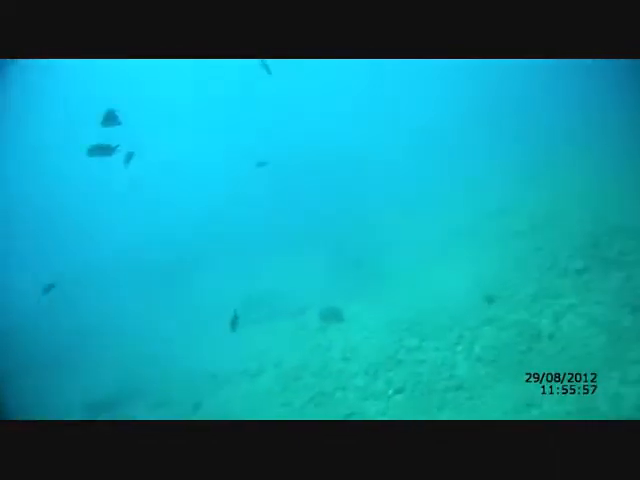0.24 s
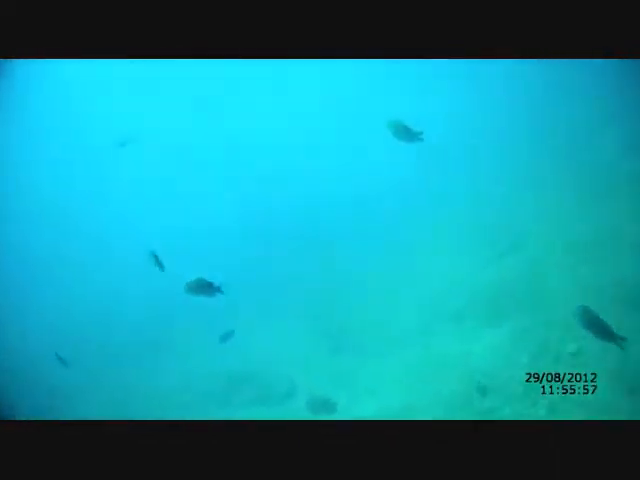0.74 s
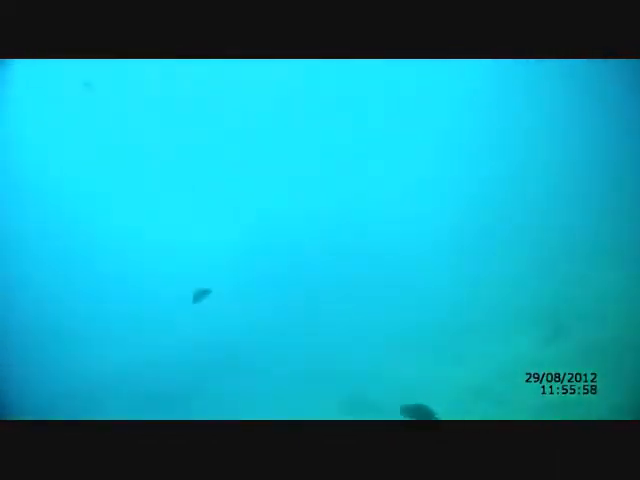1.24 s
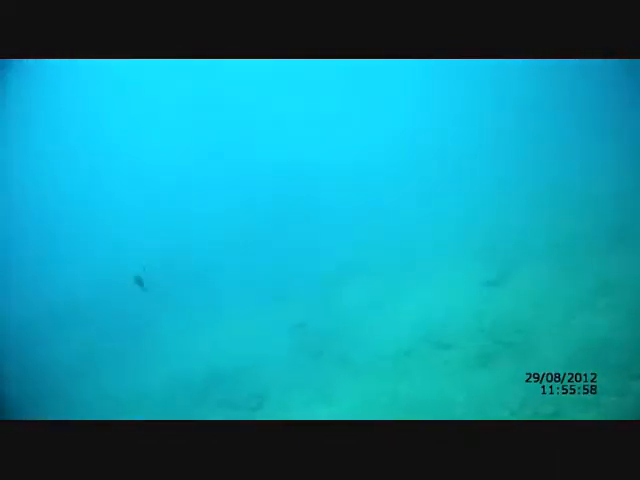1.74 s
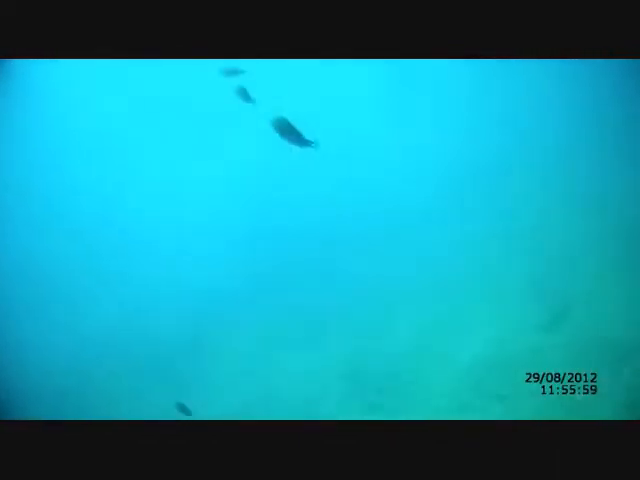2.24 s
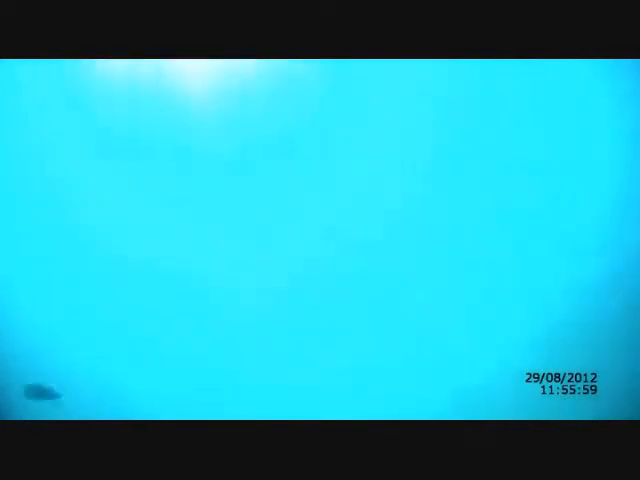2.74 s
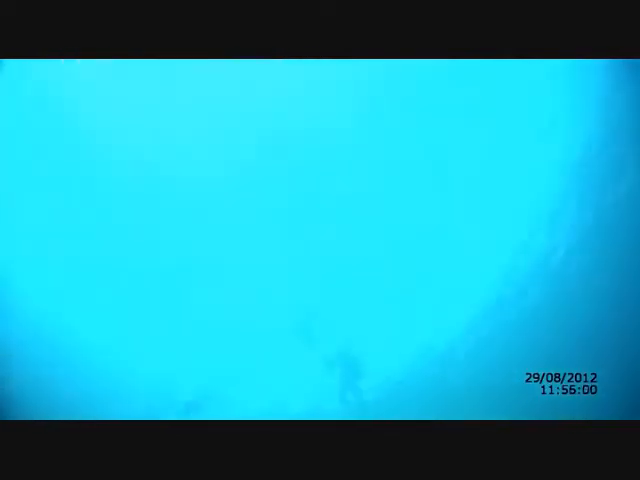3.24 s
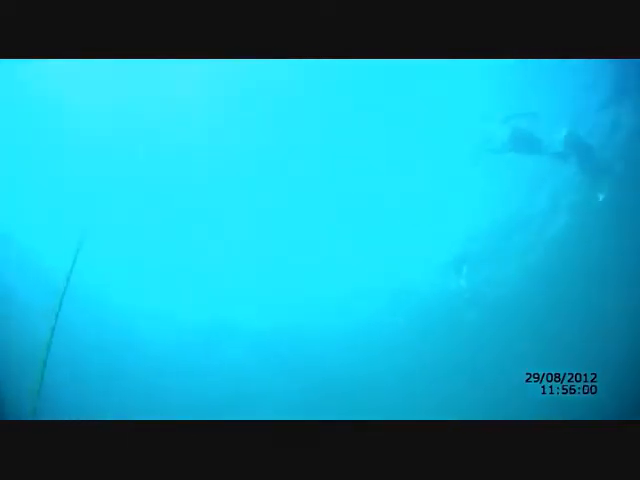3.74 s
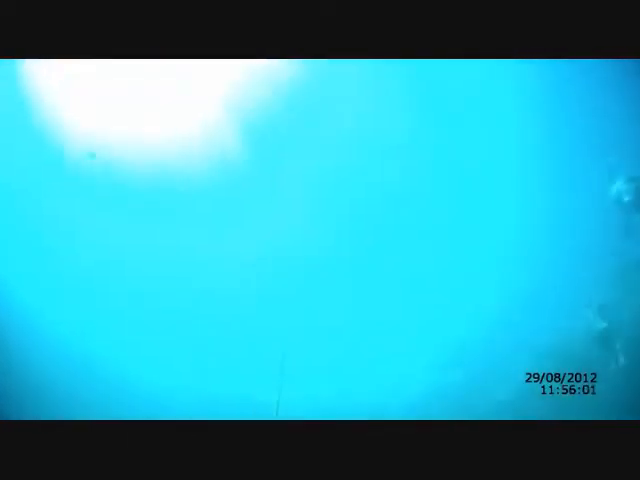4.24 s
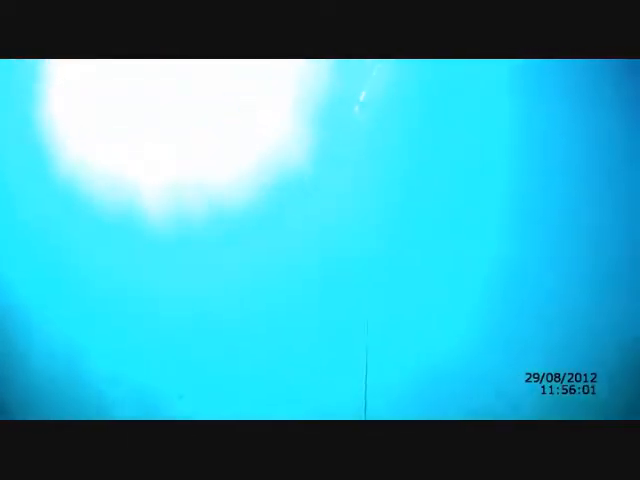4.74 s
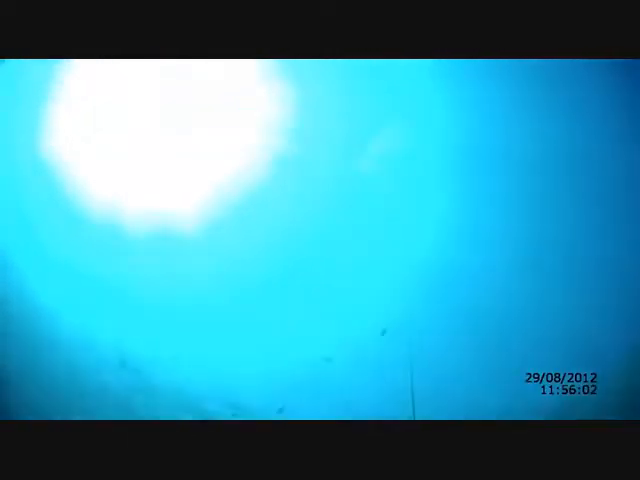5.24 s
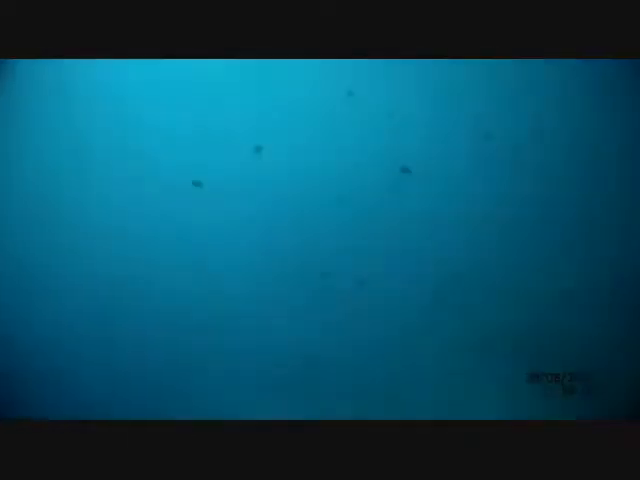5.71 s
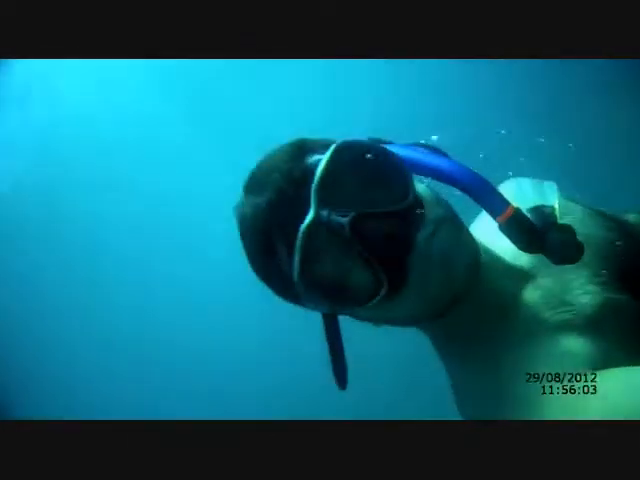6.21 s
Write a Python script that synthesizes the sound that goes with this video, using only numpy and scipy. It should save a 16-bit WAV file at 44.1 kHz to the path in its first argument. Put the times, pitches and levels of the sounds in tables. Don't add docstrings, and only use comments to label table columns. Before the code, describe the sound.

A hand-held submerged microphone in a hollow, resonant shell picks up close, muffled water. Fine crackle and fizz never quite stop. First a brief finger squeak with ringing bubbles, then a gentle glug, sparse ticks, two bubbly flurries, a quieter spell, a grip knock, and finally a rapid stuttering snag and the loudest click, ending in bubbles and snaps.

```python
import sys
import numpy as np
from scipy import signal
from scipy.fft import rfft, irfft
from scipy.io import wavfile

SR = 44100
rng = np.random.default_rng(int(sys.argv[2]) if len(sys.argv) > 2 else 0)


def store_wav(level_fs):
    pcm = np.round(np.clip(np.atleast_2d(level_fs), -1, 1) * 32767)
    wavfile.write(sys.argv[1], SR, pcm.T.astype(np.int16))


def convert_level_to_amplitude(level_db):
    exponent = np.asarray(level_db, float) / 20
    return 10 ** exponent


N = 285327


def in_time(rows):
    s, *columns = np.transpose(rows)
    return [np.interp(np.arange(N) / SR, s, c) for c in columns]


def rms_one(x):
    return x / np.sqrt(np.mean(x ** 2) + 1e-20)


def summed_db(*levels_db):
    return 10 * np.log10(sum(convert_level_to_amplitude(db) ** 2 for db in levels_db))


def edge(x, hz, kind, order=2):
    return signal.sosfilt(signal.butter(order, hz, kind, fs=SR, output="sos"), x)


def band(x, low_hz, high_hz):
    sos = signal.butter(2, [low_hz, min(high_hz, 18000)], "band", fs=SR, output="sos")
    return signal.sosfilt(sos, x)


def drift(rate_hz):
    hop = 40
    r = np.exp(-2 * np.pi * hop * rate_hz / SR)
    white = rng.standard_normal(N // hop + 2002)
    slow = signal.lfilter([1], [1, -2 * r, r * r], white)[2000:]
    return np.interp(np.arange(N) / hop, np.arange(len(slow)), rms_one(slow))


def add(out, s, sound):
    i = max(round(s * SR), 0)
    out[i:i + len(sound)] += sound[:N - i]


def alike(rows, hz, t60_s):
    return [(s, db, hz, t60_s) for s, db in rows]


def rings(rows, rise_s, glide, wobble, spray):
    out = np.zeros(N)
    chance = rng.standard_normal((len(rows), 2))
    white = rng.standard_normal(N + SR)
    for (s, db, hz, t60_s), (detune, twin_phase) in zip(rows, chance):
        t = np.arange(round(3 * t60_s * SR)) / SR
        phase = 2 * np.pi * hz * t * (1 + glide * t / t60_s)
        rise = 1 - np.exp(-t / rise_s)
        twin = np.sin(phase * (1 + np.clip(0.071 * detune, -.1, .1)) + twin_phase)
        tone = rise * convert_level_to_amplitude(-60 * t / t60_s) * (np.sin(phase) + wobble * twin)
        mist = rms_one(band(white[round(s * SR):][:len(t)], hz / 1.45, hz * 1.21))
        mist = rise * convert_level_to_amplitude(-30 * t / t60_s) * mist
        add(out, s, convert_level_to_amplitude(db) * (tone / np.abs(tone).max() + spray * mist))
    return out


def resonances(x, modes):
    out = 0
    for k, (hz, width_hz, db) in enumerate(modes):
        r = np.exp(-np.pi * width_hz / SR)
        poles = [1, -2 * r * np.cos(2 * np.pi * hz / SR), r * r]
        mode = signal.lfilter([(1 - r * r) / 2, 0, (r * r - 1) / 2], poles, x + 1e-18)
        out = out + (-1) ** (k // 2) * convert_level_to_amplitude(db) * mode
    return out


def housing(x):
    # pitch_hz, width_hz, level_db
    shell_modes = [(674, 270, -36), (787, 130, 3), (1130, 198, 2), (1630, 520, 2), (1980, 505, 6.5),
                   (2430, 147, -3.5), (3370, 330, -14.5), (3900, 830, -5.5), (5020, 540, 2), (5700, 253, 5),
                   (7036, 534, 4), (8400, 500, -7.5), (12000, 2100, -28.5)]
    return resonances(x, shell_modes)


def big_bubbles():
    # start_s, peak_db, pitch_hz, t60_s
    loose = [(0.396, -34.5, 1090, 0.056), (0.413, -32.5, 1114, 0.043), (0.478, -44, 1180, 0.064),
             (0.502, -11, 1235, 0.027), (0.503, -15, 846, 0.023), (0.54, -33, 1130, 0.015),
             (0.611, -36, 1140, 0.03), (0.785, -35.5, 1330, 0.013), (1.139, -36, 994, 0.018),
             (2.396, -32.5, 1236, 0.046), (2.485, -37.5, 1284, 0.039), (2.543, -38.5, 607, 0.021),
             (2.603, -32.5, 1260, 0.025), (2.6065, -25, 2068, 0.048), (2.609, -32, 960, 0.018),
             (2.675, -36, 1370, 0.036), (2.677, -34, 2080, 0.032), (2.666, -28, 1130, 0.051),
             (2.721, -28.5, 1154, 0.032), (2.985, -35, 1074, 0.037), (3.672, -39, 765, 0.059),
             (3.691, -30, 1130, 0.074), (3.753, -40, 1140, 0.22), (3.775, -27, 1017, 0.019),
             (3.798, -30.5, 1038, 0.11), (3.879, -36.5, 1018, 0.1), (3.923, -35.5, 1069, 0.071),
             (3.973, -34, 786, 0.055), (4.037, -26.5, 1070, 0.038), (4.096, -36, 960, 0.021),
             (4.15, -40.5, 1167, 0.083), (5.4365, -29, 1033, 0.019), (5.8832, -19.5, 1130, 0.017),
             (5.8855, -16, 1680, 0.019), (5.947, -36, 1077, 0.061), (5.98, -35.5, 1110, 0.037),
             (6.306, -20, 1140, 0.029)]
    # start_s, peak_db, pitch_hz, t60_s
    snag_ring = [
        (5.812, -16, 410, 0.02),
        (5.8198, -17.5, 440, 0.013),
        (5.8243, -17, 423, 0.044),
    ]
    # start_s, peak_db
    pops = [(0.091, -45.5), (0.332, -39.5), (0.573, -45), (0.847, -43.5), (1.368, -40), (1.586, -43),
            (1.662, -39.5), (1.744, -41.5), (2.061, -44), (2.126, -37.5), (2.236, -45), (2.264, -43),
            (2.291, -40), (2.385, -43), (2.572, -41.5), (2.784, -41.5), (2.971, -39), (3.25, -46.5),
            (4.0, -47), (4.176, -40.5), (4.349, -38.5), (4.445, -40), (4.645, -42), (4.67, -41.5),
            (4.744, -39), (4.904, -36.5), (5.094, -42.5), (5.298, -43), (5.906, -39)]
    # start_s, peak_db
    gulps = [(0.649, -46), (0.716, -43), (1.193, -42), (1.244, -42.5), (1.3, -44.5), (1.352, -44.5),
             (1.445, -51), (1.498, -47), (0.331, -46), (0.352, -52), (0.397, -41), (3.72, -42),
             (3.866, -42), (4.0, -50), (4.035, -37.5), (4.065, -43.5), (4.18, -46)]
    # start_s, peak_db, pitch_hz
    trickle = [(1.015, -46, 1180), (1.066, -50, 1210), (1.094, -49, 800), (1.209, -43.5, 1150),
               (1.284, -48, 860), (1.314, -52, 780), (1.384, -42.5, 1170), (1.444, -48, 1190),
               (1.609, -47, 1300), (1.628, -49, 1050), (1.706, -50, 795), (3.686, -35, 1205),
               (3.7, -32, 1030), (3.707, -33.5, 864), (3.764, -38, 1120), (3.786, -36, 1020),
               (3.811, -29, 1013), (3.823, -31, 975), (3.832, -41, 860), (3.891, -40, 780),
               (3.9, -45, 1080), (3.93, -41, 1060), (4.161, -39, 1030), (1.0186, -46, 2080),
               (1.044, -49, 2470), (1.279, -48, 1950), (1.4721, -48, 2060), (1.5744, -47.5, 2130),
               (1.6244, -48, 2030), (1.6494, -50, 2470), (1.6644, -47, 1900), (3.6594, -45, 1860),
               (3.6994, -39, 1830), (3.7194, -45, 2130), (3.7499, -44, 1830), (3.8094, -45, 2290),
               (3.8194, -42, 2120), (3.8294, -40, 2720), (3.8641, -43, 2100), (3.896, -51, 2430),
               (3.9295, -44, 2640), (4.0951, -48, 1890), (4.149, -51, 1980)]
    rows = loose + snag_ring + alike(pops, hz=1140, t60_s=0.029) + alike(gulps, hz=807, t60_s=0.065)
    rows = rows + [(s, db + 0.5, hz, 0.035) for s, db, hz in trickle]
    return rings(rows, rise_s=0.0014, glide=0.024, wobble=0.3, spray=0.11)


def small_bubbles():
    # start_s, peak_db, pitch_hz
    mixed = [(1.673, -46.5, 3900), (0.277, -43.5, 2610), (0.394, -38.5, 2430), (0.938, -48, 3360),
             (0.654, -45, 2380), (0.713, -37.5, 2400), (0.776, -43, 2430), (0.7881, -32.5, 1630),
             (1.08, -44, 3300), (1.14, -40.5, 2430), (1.1908, -43, 3380), (1.517, -49, 2340),
             (2.4827, -43, 3070), (2.535, -33.5, 1790), (2.601, -29, 1970), (2.6655, -29, 1700),
             (2.755, -44, 3240), (2.7767, -40.5, 2340), (3.632, -43.5, 2600), (3.7942, -38, 2320),
             (3.862, -37.5, 3540), (3.9465, -48, 2720), (4.51, -41.5, 3030), (4.507, -47, 3900),
             (4.49, -39, 1600), (4.674, -42.5, 1570), (4.768, -49, 3620), (3.05, -41.5, 2450),
             (2.998, -44.5, 3220), (1.8, -49, 2490), (1.853, -47.5, 3370), (4.469, -34, 1830),
             (4.5472, -35, 1790), (5.249, -43.5, 3380), (5.9702, -37, 2130), (6.0012, -29.5, 2075),
             (6.3405, -37, 3210), (6.3733, -29.5, 1754)]
    # start_s, peak_db
    plinks = [(0.3311, -43.5), (0.5731, -33), (0.608, -41), (1.3697, -38.5), (1.605, -40.5), (1.632, -46),
              (1.9131, -34), (2.1091, -43), (2.1287, -37.5), (2.373, -41), (2.3952, -37.5), (2.718, -39),
              (2.7386, -34), (2.9722, -34), (3.1043, -42.5), (3.1764, -39.5), (3.68, -36.5), (3.773, -37),
              (3.9722, -31), (4.0342, -39), (4.061, -41), (4.5845, -32.5), (5.0714, -38.5), (5.5917, -45.5),
              (6.1189, -42), (6.1708, -43), (6.3055, -30)]
    rows = [(*row, 0.044) for row in mixed] + alike(plinks, hz=1980, t60_s=0.029)
    return rings(rows, rise_s=0.0004, glide=0.029, wobble=0.45, spray=0.2)


def snaps():
    # start_s, peak_db, pitch_hz
    near = [(0.1504, -33.5, 6500), (0.2887, -26, 6600), (0.5666, -29, 5900), (0.594, -30, 4660),
            (0.7522, -30.5, 5900), (1.2787, -33, 5700), (2.265, -29, 5180), (2.396, -31, 3900),
            (2.4416, -30.5, 4840), (2.6008, -25, 6930), (2.678, -30.5, 4760), (2.7191, -30, 8200),
            (2.7846, -31, 5720), (3.0423, -35, 6440), (3.7193, -31, 5850), (3.7746, -23.5, 4730),
            (3.858, -33, 4540), (3.8646, -31, 7200), (4.4461, -31, 6450), (4.4737, -29, 4770),
            (4.838, -31.5, 4960), (5.1397, -33, 6440), (5.254, -27.5, 5020), (5.7244, -36, 6260),
            (5.9762, -26, 5260), (6.0021, -20, 4800), (6.0196, -22, 6100), (6.1588, -34, 6900),
            (6.3763, -21.5, 5300)]
    # start_s, peak_db, pitch_hz
    pricks = [(0.4877, -44, 7750), (0.4883, -29, 7800), (0.615, -38, 8770), (0.7093, -44, 7760),
              (1.1896, -43, 8650), (1.2819, -48, 8800), (1.4636, -49, 10100), (1.4879, -47, 8600),
              (1.5847, -43, 7800), (1.5968, -45, 10100), (1.945, -46, 8300), (2.0202, -45, 8750),
              (2.0604, -46, 7800), (2.1379, -39, 8200), (2.2287, -42, 8000), (2.2797, -48, 10100),
              (2.374, -39.5, 8350), (2.4393, -38, 8500), (2.557, -30.5, 8500), (2.7755, -44, 7700),
              (3.3975, -45, 8600), (3.8461, -40.5, 8600), (4.549, -39, 8500), (5.2495, -37.5, 7300),
              (5.725, -39, 8700), (5.967, -42, 8410), (6.0096, -48, 7750), (6.1558, -47, 8710),
              (6.3856, -21.5, 8400), (6.4013, -48, 8660)]
    # start_s, peak_db, pitch_hz
    crackle = [(0.467, -39, 5900), (0.474, -41, 5950), (0.5062, -31, 5810), (0.5284, -31, 7090),
               (0.535, -40, 5900), (0.549, -39, 5820), (0.5764, -42, 6510), (0.5874, -33, 4840),
               (0.6054, -36, 6800), (0.623, -34, 7340), (0.636, -32.5, 4040), (0.6544, -32, 3200),
               (0.7088, -41, 5740), (0.7786, -53, 5110), (0.8, -46, 6640), (1.0435, -39.5, 5700),
               (1.063, -33.5, 6800), (1.584, -36, 5770), (1.733, -37.5, 5800), (1.879, -40, 4700),
               (1.913, -34.5, 6600), (1.931, -35, 6800), (2.062, -37, 7300), (2.2894, -46, 5690),
               (2.344, -37, 6740), (2.3737, -35, 3720), (2.648, -35, 6600), (2.685, -33, 5810),
               (2.7444, -38.5, 3340), (2.7904, -38, 6740), (2.829, -39, 5900), (2.8526, -37, 6700),
               (2.8802, -38, 5970), (2.9854, -38, 4700), (3.029, -51, 6700), (3.1574, -44, 3900),
               (3.2306, -40, 5730), (3.4837, -34, 6740), (3.556, -32.5, 5700), (4.1495, -38, 4830),
               (4.3494, -46, 6680), (2.449, -33, 4800), (3.126, -45.5, 4340), (4.945, -54, 6860),
               (5.362, -45, 5860), (5.556, -34.5, 5800), (6.0561, -38, 6250), (6.174, -40, 5830),
               (6.2054, -44, 4930), (6.2314, -44, 5100), (6.2584, -36, 5670), (6.4053, -28, 5400),
               (1.133, -39, 6900), (1.4484, -30.5, 5800), (4.164, -38, 4950), (4.274, -36, 6000)]
    rows = near + [(s, db - 3, hz) for s, db, hz in pricks + crackle]
    rows = [(s, db, hz, 70 / hz) for s, db, hz in rows]
    return rings(rows, rise_s=0.000091, glide=0.015, wobble=0.98, spray=0.17)


def after_ticks(t60_s):
    # start_s, peak_db
    tick_rows = [(0.0653, -32), (0.1032, -31), (0.218, -29.5), (0.2404, -52), (0.2733, -41), (0.3476, -38),
                 (0.8895, -37), (1.1318, -35), (1.4485, -44), (1.799, -32.5), (1.822, -40), (1.895, -31.5),
                 (1.944, -44), (2.1181, -33), (2.139, -34), (2.5341, -34.5), (2.9301, -32), (3.0285, -29),
                 (3.0764, -35), (3.18, -34.5), (3.3079, -32.5), (3.3162, -35.5), (3.3963, -38),
                 (3.4241, -42), (3.6314, -35), (3.742, -41), (3.7958, -37), (3.8633, -27.5), (3.8774, -32),
                 (3.91, -35), (3.923, -35), (4.0093, -38), (4.0486, -32.5), (4.5495, -42), (4.6154, -34.5),
                 (4.65, -42), (4.7656, -42), (5.0716, -32), (5.1377, -29.5), (5.6687, -33.5), (5.6884, -39),
                 (5.9515, -35), (6.107, -41), (6.305, -34.5), (6.4422, -34.5)]
    s, db = np.transpose(tick_rows)
    jumps = np.zeros(N)
    jumps[(s * SR).astype(int)] = convert_level_to_amplitude(db)
    return signal.lfilter([1], [1, -convert_level_to_amplitude(-60 / (t60_s * SR))], jumps + 1e-18)


def ticks():
    crack = after_ticks(t60_s=0.021) * rng.standard_normal(N)
    return convert_level_to_amplitude(-4.5) * housing(edge(crack, 2400, "high"))


def finger():
    # start_s, length_s, slips_per_s, peak_db, highest_hz
    slow_creaks = [
        (2.52, 0.043, 94, -37.5, 1000),
        (3.799, 0.016, 560, -35, 3120),
        (5.4265, 0.012, 261, -26, 1060),
        (5.446, .0086, 310, -36.5, 1130),
        (5.998, 0.037, 480, -43, 560),
        (6.075, .055, 520, -47, 560),
    ]
    # start_s, length_s, peak_db, lowest_hz, highest_hz
    rubs = [(0.4845, 0.075, -39, 2700, 9350), (0.7858, 0.003, -30, 1040, 2660),
            (1.744, 0.00056, -36.5, 298, 3400), (4.5484, 0.0013, -31.5, 1500, 9500),
            (4.839, 0.058, -35.5, 3520, 7700), (5.132, 0.098, -43, 3920, 7000),
            (5.16, 0.0022, -35, 3950, 6940), (5.247, 0.077, -39, 3650, 5700),
            (5.261, 0.0012, -30, 1800, 6250), (5.815, 0.01, -16, 4170, 5790),
            (5.8846, 0.0018, -21.5, 8500, 10300), (5.8842, 0.003, -8, 2600, 5100),
            (5.8852, 0.0005, -15, 1500, 12600), (5.893, 0.0018, -16.5, 3210, 3900),
            (5.893, .0019, -12.5, 1500, 9200), (5.907, 0.0036, -29, 3840, 5500),
            (6.369, 0.026, -29, 1560, 6740), (6.374, 0.019, -31, 8000, 11500),
            (0.49, 0.053, -34, 2600, 4180), (0.5, 0.13, -53, 8600, 11800)]
    # start_s, length_s, peak_db, lowest_hz, highest_hz
    squeak = [
        (0.4843, 0.0088, -15, 1980, 2770),
        (0.4865, 0.0074, -21.5, 910, 1520),
        (0.494, 0.016, -20.5, 840, 1550),
        (0.494, 0.0087, -23, 472, 750),
        (0.496, 0.012, -25, 1780, 2450),
    ]
    snag_s = [
        5.8118,
        5.8151,
        5.8189,
        5.8238,
    ]
    # peak_db, lowest_hz, highest_hz
    snag_bands = [
        (-12, 810, 2830),
        (-29.5, 3270, 3900),
        (-28, 7500, 11800),
    ]
    rub_slips_per_s, squeak_slips_per_s, single_slip_s = 1200, 412, 0.0005
    lowest_per_slip = 0.52
    rows = [(s, length_s, per_s, db, lowest_per_slip * per_s, top_hz)
            for s, length_s, per_s, db, top_hz in slow_creaks]
    for contacts, per_s in (rubs, rub_slips_per_s), (squeak, squeak_slips_per_s):
        rows += [(s, length_s, per_s, *rest) for s, length_s, *rest in contacts]
    return rows + [(s, single_slip_s, rub_slips_per_s, *row) for s in snag_s for row in snag_bands]


def creaks():
    # pitch_hz, width_hz, level_db
    hollow = [(445, 40, 4.5)]
    out = np.zeros(N)
    for s, length_s, per_s, db, low_hz, high_hz in finger():
        chance = rng.standard_normal((120, 2))
        gaps = np.exp(per_s / 4000 * chance[1:, 0])
        at_s = np.cumsum(np.r_[0, gaps]) / per_s
        fade_db = 14 * (per_s / 1100 - .45) * at_s / length_s
        inside = at_s < length_s
        slips = np.zeros(N // 30)
        slips[(at_s[inside] * SR).astype(int)] = convert_level_to_amplitude(1.8 * chance[:, 1] - fade_db)[inside]
        contact = band(band(slips, low_hz, high_hz), low_hz, high_hz)
        contact = edge(contact, min(1.09 * high_hz, 18000), "low", order=3)
        full = housing(contact) + 0.018 * contact - resonances(contact, hollow)
        add(out, s, convert_level_to_amplitude(db) * full / np.abs(full).max())
    return out


def knocks():
    # start_s, peak_db, pitch_hz, t60_s
    knock_rows = [(0.324, -53, 83, 0.025), (.495, -27, 270, 0.012), (0.891, -52.5, 146, 0.082),
                  (1.375, -59, 522, 0.12), (1.64, -52, 490, 0.037), (1.746, -37.5, 113, 0.047),
                  (2.212, -43.5, 136, 0.018), (2.509, -50, 88.5, 0.022), (2.753, -43, 129, 0.0076),
                  (3.329, -45, 82.4, 0.026), (3.379, -46, 135, 0.039), (3.685, -45.5, 467, 0.059),
                  (3.69, -48.5, 175, 0.028), (5.4258, -31, 166, 0.06), (5.431, -29, 430, 0.027),
                  (5.735, -39.5, 24.6, 0.55), (5.9, -47, 25.3, 0.49), (5.812, -35, 304, 0.02),
                  (5.88, -37, 96, 0.034), (5.883, -39, 430, 0.037), (6.14, -41.5, 32, 0.16),
                  (6.38, -45, 26, 0.29), (6.364, -50.5, 409, 0.13)]
    return rings(knock_rows, rise_s=0.001, glide=0.023, wobble=0.11, spray=0.45)


def water_levels():
    # time_s, level_db
    stir = [(0.0, -74), (0.358, -47.5), (0.482, -41), (0.49, -31), (0.57, -35), (0.85, -56), (1.29, -52.5),
            (2.11, -55), (2.52, -48), (3.61, -61.5), (3.64, -47.5), (3.88, -49.5), (4.2, -55), (4.74, -51),
            (5.64, -56.5), (5.8, -53), (5.82, -49.5), (6.47, -52.5)]
    stir_db, = in_time(stir)
    t = np.arange(N) / SR - 1.12
    rise_db_per_s, fall_db_per_s = 62, 41
    leak_db = -44 + np.minimum(rise_db_per_s * t, -fall_db_per_s * t)
    wash_db = -19 + 20 * np.log10(after_ticks(t60_s=0.24) + 1e-9)
    gurgle_mean_db = -57
    gurgle_db = gurgle_mean_db + 0.73 * (stir_db - gurgle_mean_db)
    gurgle_db = summed_db(gurgle_db, wash_db - 8.5)
    fizz_db = summed_db(-60.5, stir_db - 11, wash_db)
    glug_db = summed_db(leak_db, stir_db - 16)
    return gurgle_db, fizz_db, glug_db


def grains(per_s, low_hz, high_hz, cycles, spread_db, clump_db, count):
    sizes = convert_level_to_amplitude(spread_db * np.minimum(rng.exponential(1, N), 3.3)) * rng.choice([-1, 1], N)
    born = rng.random(N) < per_s * convert_level_to_amplitude(clump_db * drift(18)) / SR
    dealt, out = rng.integers(0, count, N), 0
    for k, hz in enumerate(np.geomspace(low_hz, high_hz, count)):
        r, w = convert_level_to_amplitude(-60 * hz / (cycles * SR)), 2 * np.pi * hz / SR
        hits = sizes * born * (dealt == k) + 1e-18
        out = out + signal.lfilter([0, np.sin(w)], [1, -2 * r * np.cos(w), r * r], hits)
    return rms_one(out)


def flow(gurgle_db, fizz_db, glug_db):
    bed = rng.standard_normal((2, N))
    glug = grains(160, 680, 900, cycles=35, spread_db=3.5, clump_db=3, count=5)
    gurgle = grains(330, 1016, 3390, cycles=33.4, spread_db=3.5, clump_db=4.5, count=10)
    gurgle = gurgle + 0.31 * rms_one(band(bed[0], 1870, 4100))
    fizz = grains(1800, 3360, 10430, cycles=28.0, spread_db=5.5, clump_db=3.0, count=10)
    fizz = fizz + 0.33 * rms_one(edge(bed[1], 2900, "high"))
    finest = grains(250, 4100, 6900, cycles=4.3, spread_db=2.5, clump_db=4.0, count=3)
    fizz = fizz + 0.64 * finest
    water = convert_level_to_amplitude(glug_db - 12.0) * glug + convert_level_to_amplitude(gurgle_db - 4.0) * gurgle + convert_level_to_amplitude(fizz_db + 1.5) * fizz
    return housing(water)


def ports(shell):
    # pitch_hz, width_hz
    dead_spots = [(970, 67), (1500, 79), (1770, 185), (2930, 32)]
    for hz, width_hz in dead_spots:
        shell = signal.lfilter(*signal.iirnotch(hz, hz / width_hz, fs=SR), shell)
    deep = edge(shell, 390, "low")
    duller = edge(shell - deep, 1600, "low", order=1)
    sides = np.array([[1], [-1]])
    left_minus_right_db = 6
    ringing = (shell - deep + 0.074 * sides * duller) * convert_level_to_amplitude(left_minus_right_db * sides / 2)
    return 0.94 * ringing + deep * convert_level_to_amplitude(-1.5 * sides)


def rumble():
    # time_s, level_db
    swell = [(0.0, -59), (1.96, -64), (3.3, -62.5), (3.55, -63), (3.8, -62.5), (5.5, -62.5), (5.84, -52.5),
             (6.31, -63), (6.47, -53.5)]
    swell_db, = in_time(swell)
    white = rng.standard_normal((3, N))
    shared, left, right = edge(edge(white, 3.9, "low", order=1), 730, "low", order=1)
    pair = np.array([shared + 0.17 * left, shared + 0.42 * right]) * convert_level_to_amplitude([[-1.5], [1.5]])
    return convert_level_to_amplitude(swell_db + 4.5) * rms_one(edge(pair, 1, "high", order=1))


def own_noise():
    # pitch_hz, level_db (per Hz)
    hiss = [(35, 6), (60, -4.5), (627, -6.5), (1740, -10.5), (1960, -5), (3000, -14), (6500, -8),
            (8300, -16), (15500, -23.5)]
    hz, db = np.transpose(hiss)
    bins_hz = np.maximum(np.fft.rfftfreq(N, 1 / SR), 1)
    white = rng.standard_normal((3, N))
    pair = rfft(white[:2] + 0.72 * white[2])
    shape = convert_level_to_amplitude(np.interp(np.log(bins_hz), np.log(hz), db))
    return convert_level_to_amplitude(-59) * rms_one(irfft(pair * shape, N))


def scene():
    shell = big_bubbles() + small_bubbles() + snaps() + ticks() + creaks() + knocks()
    shell = shell + flow(*water_levels())
    return ports(shell) + rumble()


def roll_off(x):
    return signal.sosfilt(signal.butter(12, 15200, fs=SR, output="sos"), x)


def record(dry):
    offset = [
        [.0035],
        [.0045],
    ]
    raw = edge(dry + own_noise(), 15150, "low", order=20) + np.array(offset)
    return roll_off(raw)


dry = scene()
out = record(dry)
store_wav(out)
```